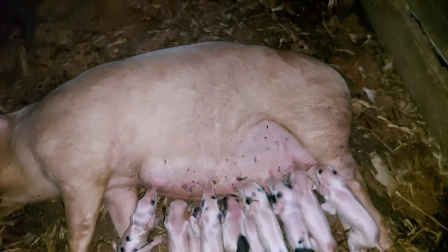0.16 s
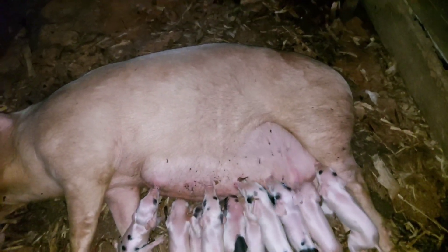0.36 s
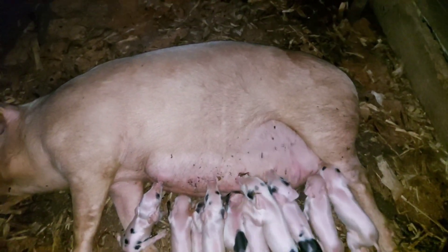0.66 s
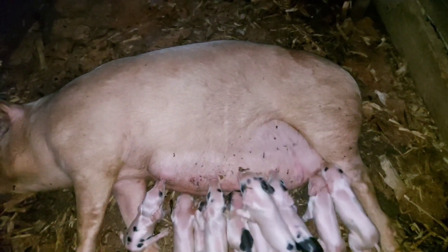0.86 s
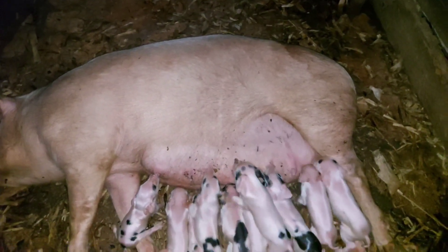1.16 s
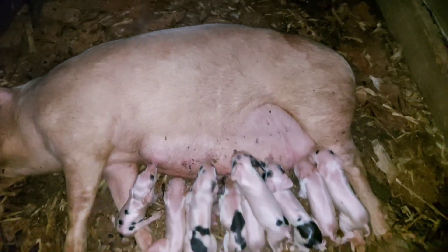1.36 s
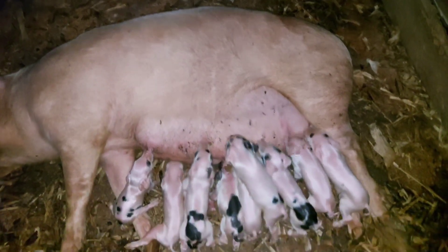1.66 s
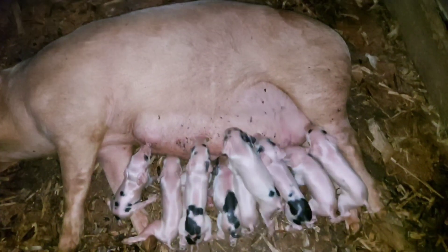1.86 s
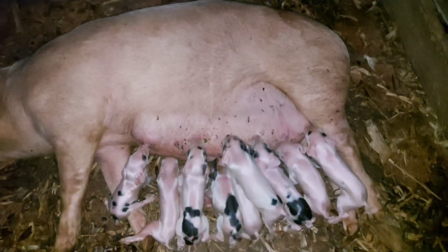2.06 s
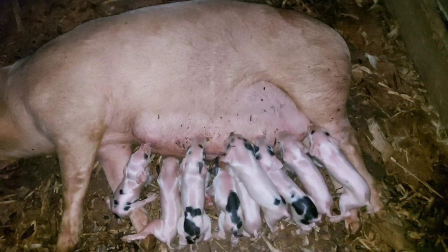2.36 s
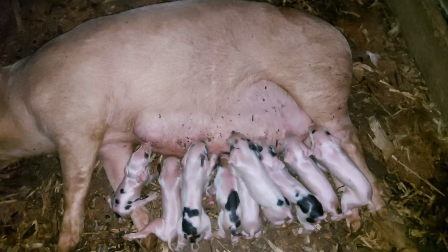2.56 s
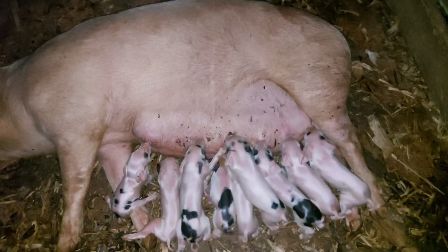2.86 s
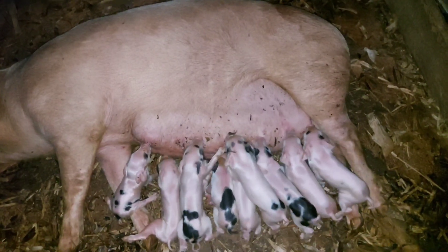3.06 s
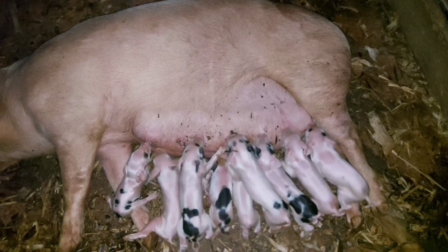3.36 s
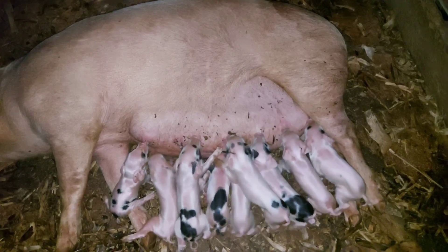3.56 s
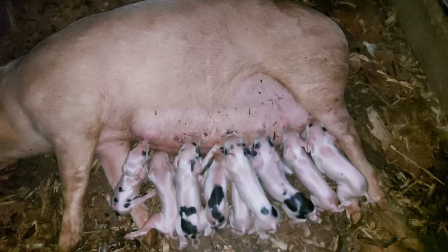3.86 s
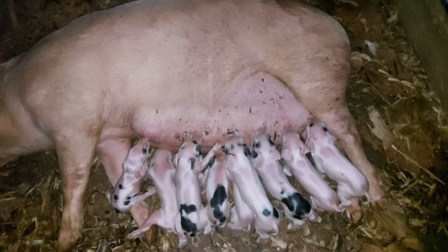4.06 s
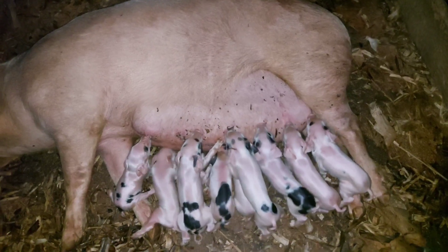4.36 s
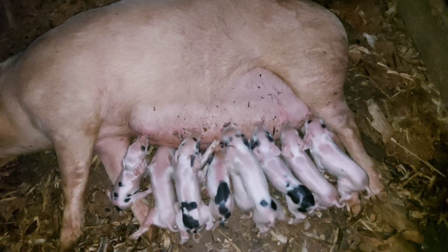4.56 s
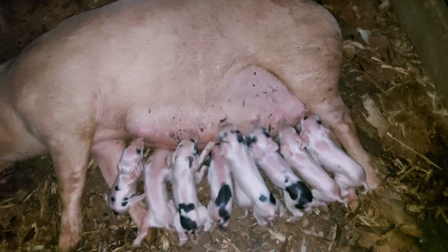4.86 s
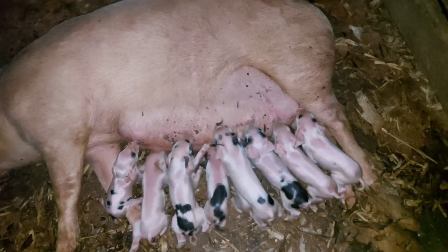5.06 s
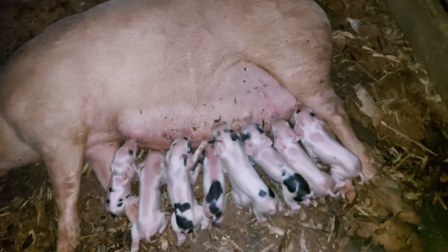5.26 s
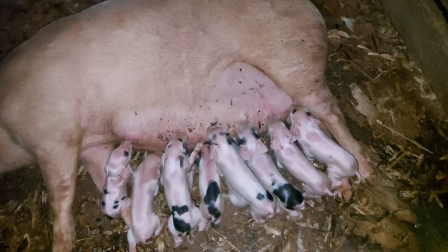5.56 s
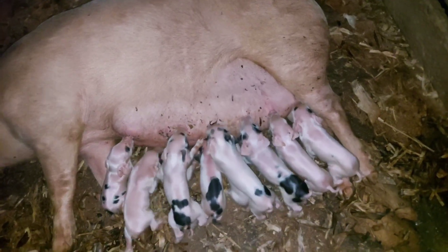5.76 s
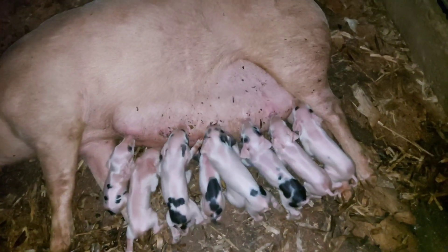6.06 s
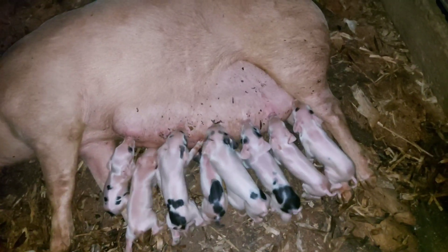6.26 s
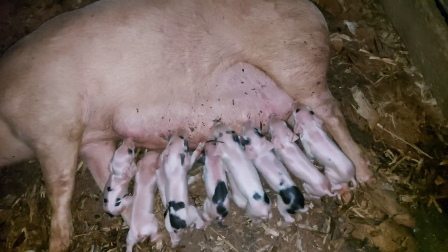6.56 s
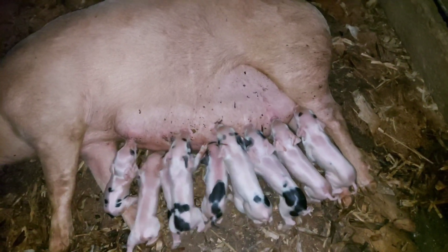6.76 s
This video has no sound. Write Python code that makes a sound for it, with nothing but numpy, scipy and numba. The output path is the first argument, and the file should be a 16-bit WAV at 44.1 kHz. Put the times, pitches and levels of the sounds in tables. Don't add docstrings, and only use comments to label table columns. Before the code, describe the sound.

Low throaty pig grunts in brief bursts, with wet suckling, thin nasal piglet whistles, straw crackles and a continuous high night-insect trill.

```python
import sys
import numpy as np
from scipy import signal
from scipy.fft import rfft, irfft
from scipy.io import wavfile
from scipy.ndimage import uniform_filter1d
from numba import njit

SR = 44100
rng = np.random.default_rng(int(sys.argv[2]) if len(sys.argv) > 2 else 0)


def volts_from_decibels(level):
    exponent = np.asarray(level, float) / 20
    return 10 ** exponent


def pcm_store(signal):
    levels = np.round(np.clip(np.atleast_2d(signal), -1, 1) * 32767)
    wavfile.write(sys.argv[1], SR, levels.astype(np.int16).T)


N = 304731
TIME = np.arange(N) / SR


def read(table):
    s, *columns = np.transpose(table)
    inside = 1. * ((TIME >= s[0]) & (TIME <= s[-1]))
    gate = uniform_filter1d(inside, size=441, mode="nearest")
    return gate, *(np.interp(TIME, s, c) for c in columns)


def unit(x):
    return x / np.sqrt(np.mean(x ** 2) + 1e-18)


def pan(db):
    return volts_from_decibels(np.array([[db], [-db]]) / 2)


def add(out, x, s):
    i = int(s * SR)
    out[:, i:i + x.shape[1]] += x[:, :N - i]


def colour(spectrum, side_db):
    hz, db = np.transpose(spectrum)
    bins_hz = np.arange(N // 2 + 1) * SR / N
    gain = volts_from_decibels(np.interp(np.log(bins_hz + 1), np.log(hz), db, left=-90, right=-90))
    mid, side = irfft(rfft(rng.standard_normal((2, N))) * gain, N)
    mid, side = unit(mid), volts_from_decibels(side_db) * unit(side)
    return np.array([mid + side, mid - side])


def walk(rate):
    hold = int(SR / rate)
    steps = np.repeat(rng.standard_normal(2500), hold)[:N]
    return unit(uniform_filter1d(uniform_filter1d(steps, hold), hold))


@njit
def svf(x, hz, width):
    y, band, low = np.empty(len(x)), 0., 0.
    for i in range(len(x)):
        g, k = np.tan(np.pi * hz[i] / SR), width / hz[i]
        v = (band + g * (x[i] - low)) / (1 + g * (g + k))
        band, low, y[i] = 2 * v - band, low + 2 * g * v, k * v
    return y


def ring(modes, chance, rise_s, scatter_db, spread):
    t = np.arange(SR // 3) / SR
    hz, db, t60 = np.transpose(modes)[:, :, None]
    decay = np.exp(-np.log(1000) * t / t60)
    rise = 1 - np.exp(-(t / rise_s) ** 2)
    size = volts_from_decibels(db + scatter_db * chance[0][:, None]) * decay * rise
    turn = 2 * np.pi * hz * (1 + 0.014 * chance[1][:, None]) * t + np.pi
    lead = spread * chance[2][:, None]
    left = np.sum(size * np.sin(turn + lead), axis=0)
    right = np.sum(size * np.sin(turn - lead), axis=0)
    out = np.array([left, right])
    return out / np.max(np.abs(out.mean(axis=0)))


# start in seconds, peak level in dB, chest level in dB, snout level in dB.
FLAPS = [(0.394, -35, -7, -22), (0.432, -16, -16, -21), (0.477, -9, -10, -15.5), (0.526, -15.5, -13.5, -20),
         (1.392, -34.5, 3, -36), (1.433, -27, -35, -64.5), (1.45, -22, -8, -36), (1.488, -9, -28, -29.5),
         (1.529, -9.5, -11, -25), (1.572, -15.5, -39, -35), (2.213, -31.5, -3, -23), (2.254, -19, -5, -15),
         (2.277, -10.5, -18.5, -15.5), (2.291, -6.5, -15, -30.5), (2.337, -8, -11.5, -38),
         (2.382, -20.5, -35, -33.5), (3.729, -37, -8, -15), (3.766, -16, -16.5, -21.5),
         (3.812, -7, -11.5, -15.5), (3.86, -11, -15, -16.5), (3.912, -15, -11, -23.5),
         (5.106, -28, -6, -35), (5.139, -12, -18, -11), (5.176, -9, -14, -22), (5.222, -9.5, -11.5, -23.5),
         (5.261, -12.5, -27, -31.5)]
# frequency in Hz, level in dB, 60 dB decay time in seconds.
CHEST = [(66.6, -12, 0.28), (94.9, -4, 0.17)]
# frequency in Hz, level in dB, 60 dB decay time in seconds.
THROAT = [(240, -7, 0.17), (335.3, 1, 0.22), (366.2, 1, 0.084), (423, 5, 0.056), (445.5, -2.5, 0.058),
          (506.4, -2, 0.089), (593, -3.5, .1), (630.7, -15, 0.27), (683, -18, 0.027), (780.6, -6, 0.096),
          (908, -13, 0.094), (1002, -10, 0.042), (1086, -20, 0.25)]
# frequency in Hz, bandwidth in Hz, level in dB.
SNOUT = [(1600, 360, -8.5), (2080, 240, 3.5), (2780, 430, 0), (3320, 160, 0.5), (3720, 130, -9),
         (4170, 160, -5.5)]


def sow():
    out = np.zeros((2, N))
    chance = rng.standard_normal((len(FLAPS), 3, 3, len(THROAT)))
    mid, side = rng.standard_normal((2, N))
    air = []
    for x in (mid + 1.1 * side, mid - 0.7 * side):
        bands = [volts_from_decibels(db) * svf(x, np.full(N, 1. * hz), 1. * width) for hz, width, db in SNOUT]
        air.append(unit(sum(bands)))
    soften = signal.butter(4, 5200, fs=SR, output="sos")
    air = signal.sosfilt(soften, np.array(air) * volts_from_decibels(3.8 * walk(250)))

    t = TIME[:SR // 8]
    burst = t / 0.0092 * np.exp(1 - t / 0.0071)
    breath = volts_from_decibels(-3) * np.clip(t / .004, 0, 1) * np.exp(-t / 0.045)
    puff = burst + breath
    for (s, db, chest_db, snout_db), (a, b, c) in zip(FLAPS, chance):
        throat = ring(THROAT, a, rise_s=.0012, scatter_db=1.5, spread=.2) * pan(2.4)
        chest = ring(CHEST, b[:, :len(CHEST)], rise_s=.009, scatter_db=1.5, spread=.04) * pan(.4)
        add(out, volts_from_decibels(db) * (throat + volts_from_decibels(chest_db + 0.5) * chest), s + .0011)
        echo = ring(THROAT, c, rise_s=.002, scatter_db=2.0, spread=.4)
        add(out, volts_from_decibels(db - 6.5) * echo, s + .0118)
        i = int(s * SR)
        add(out, volts_from_decibels(db + snout_db - 7.5) * puff * air[:, i:i + len(t)], s + .0005)
    out *= volts_from_decibels(1.6 * walk(130))
    out -= .7 * np.array([svf(x, np.full(N, 165.), 93.0) for x in out])
    return (out + volts_from_decibels(WALLS_DB) * walls(out)) * pan(1.0)


# start in seconds, glide in seconds, length in seconds,
# first pitch in Hz, last pitch in Hz, level in dB.
WHISTLES = [(1.165, 0.0233, 0.14, 1430, 2215, -51), (1.53, 0.042, .08, 1795, 2520, -42),
            (2.075, 0.13, 0.28, 1814, 2580, -46.5), (2.39, 0.026, 0.11, 1530, 2340, -49),
            (2.5, 0.042, 0.11, 1484, 2080, -42), (3.93, 0.024, 0.066, 1690, 1730, -47),
            (4.76, 0.03, 0.095, 2100, 2570, -50), (4.865, 0.065, 0.082, 1720, 1450, -51.5),
            (4.92, .025, 0.049, 1540, 2010, -40), (4.955, 0.063, 0.36, 1870, 2314, -46),
            (6.7, .02, 0.069, 1640, 1760, -45)]
# start in seconds, glide in seconds, length in seconds,
# first pitch in Hz, last pitch in Hz, level in dB.
SNIFFS = [(0, 0.066, 0.18, 720, 650, -48), (2.11, 0.06, 0.28, 1550, 2250, -46.5),
          (3.08, .1, 0.31, 750, 744, -61.5), (5.61, 0.031, 0.055, 900, 1130, -56.5),
          (5.72, .04, 0.027, 1082, 800, -56.5), (3.5, 0.056, 0.11, 1300, 1100, -61.5),
          (0, .02, 0.12, 2920, 2850, -45), (.02, .03, 0.069, 1400, 1520, -51),
          (.89, .03, 0.085, 1875, 2580, -54.5), (1.61, 0.16, 0.39, 1600, 2920, -44.5),
          (2.33, .05, 0.11, 1490, 1600, -44), (2.72, 0.18, 0.49, 2200, 2620, -53.5),
          (3.35, 0.18, 0.43, 2490, 2690, -55), (4.0, 0.18, 0.25, 2390, 2680, -57.5),
          (4.37, 0.17, 0.35, 1435, 2930, -44.5), (5.35, 0.13, 0.16, 2420, 2550, -56),
          (5.62, 0.062, 0.16, 2680, 2880, -47), (5.83, 0.042, .2, 2630, 2840, -57),
          (6.14, 0.037, 0.33, 2520, 2550, -55), (6.66, .1, 0.2, 2370, 2500, -58.5)]
# start in seconds, peak level in dB, pitch in Hz,
# 60 dB decay time in seconds, rise in seconds, left minus right in dB.
SMACKS = [(.021, -31, 657, 0.023, 0.00091, 2), (.113, -48, 305, 0.033, 0.0022, -5),
          (.757, -41.5, 300, 0.1, 0.0016, 5), (.76, -39.5, 590, 0.072, .004, 5),
          (1.81, -42, 295, 0.15, 0.0051, -2), (1.88, -31, 281, 0.087, 0.013, 1.5),
          (1.88, -50, 538, 0.11, 0.013, 7), (2.94, -49.5, 900, 0.037, .002, 13),
          (3.15, -36.5, 1994, 0.027, .002, 8), (3.555, -47.5, 820, 0.048, 0.0022, 10),
          (4.676, -57, 786, 0.036, .002, 8), (5.015, -22, 1990, 0.021, 0.00075, 6),
          (5.62, -38, 2107, 0.076, 0.0016, 4), (6.56, -48, 240, 0.099, .004, 7),
          (6.703, -56, 616, 0.036, 0.0016, 3)]
# time in seconds, level in dB.
SUCKLING = [
    [(0.0, -51), (0.32, -53.5), (0.42, -59.5)],
    [(0.62, -54), (0.69, -61.5), (1.46, -59.5)],
    [(1.62, -46), (2.124, -62.5), (2.2, -56)],
    [(2.45, -47), (2.572, -58), (3.3, -54.5), (3.75, -66.5)],
    [(3.95, -54), (4.202, -62), (4.98, -48), (5.1, -56)],
    [(5.3, -50.5), (5.496, -51.5), (5.922, -57.5), (6.68, -60), (6.91, -53.5)],
]
# frequency in Hz, density in dB per Hz.
SUCKLING_COLOUR = [(1100, -24), (1400, -12), (2000, -4), (2600, 1.5), (3000, -3), (3200, -9)]


def piglets():
    whistles = nose(WHISTLES, width_hz=70., rasp=.3)
    out = (whistles + nose(SNIFFS, width_hz=190.0, rasp=0.46)) * volts_from_decibels(2.0 * walk(45))
    out = signal.sosfilt(signal.cheby2(8, 40, 3250, fs=SR, output="sos"), out)
    chance = rng.standard_normal((len(SMACKS), 3, 2))
    for (s, db, hz, t60, rise_s, pan_db), c in zip(SMACKS, chance):
        modes = [(hz, 0, t60), (1.17 * hz, -9, 1.3 * t60)]
        add(out, volts_from_decibels(db) * pan(pan_db) * ring(modes, c, rise_s, scatter_db=3.5, spread=0.1), s)
    hiss = colour(SUCKLING_COLOUR, side_db=0.0)
    hiss = hiss * volts_from_decibels(read(np.concatenate(SUCKLING))[1] - 2.0 + 3.2 * walk(17))
    return out + volts_from_decibels(WALLS_DB + 8) * walls(out) + hiss


def nose(rows, width_hz, rasp):
    out = np.zeros((2, N))
    for s, glide_s, length_s, from_hz, to_hz, db in rows:
        t = TIME[:int(length_s * SR)]
        hz = from_hz + (to_hz - from_hz) * np.clip(t / glide_s, 0, 1) ** 0.67
        mid, side = rng.standard_normal((2, SR))[:, :len(t)]
        air = []
        for x in (mid + 0.52 * side, mid - .6 * side):
            note = unit(svf(svf(x, hz, width_hz), hz, 2 * width_hz))
            under = unit(svf(svf(x, 0.86 * hz, 450.0), 0.86 * hz, 440.0))
            air.append(note + rasp * under)
        shape = np.clip(t / 0.0048, 0, 1) * np.clip((length_s - t) / (0.41 * length_s), 0, 1)
        add(out, volts_from_decibels(db) * shape * np.array(air), s)
    return out


# start in seconds, peak level in dB, dull crack in dB, top hiss in dB,
# 60 dB decay time in seconds.
SNAPS = [(0.1955, -27, -5, -14, 0.08), (0.251, -23, -2, -13, 0.054), (0.2808, -35, 5.5, -18, 0.057),
         (0.5322, -28.5, 0.5, -9, 0.059), (0.745, -38.5, -2, -11, 0.12), (0.8987, -34.5, 0.5, -14, 0.08),
         (1.1368, -29, 0.5, -12, 0.08), (1.2268, -31, -3, -7, 0.2), (1.3882, -46, -11, 4, 0.11),
         (1.541, -31, 3, 2, 0.069), (1.6781, -39, -8, -1, 0.08), (1.7389, -32, -7, -4, 0.056),
         (2.1779, -53, 2, -17, 0.078), (2.2802, -23, -9, -10, 0.08), (2.6549, -26, -9, -3, 0.06),
         (2.946, -31.5, -15, -1, 0.13), (3.0654, -54, -10, -7, 0.08), (3.21, -34, -2, 0, 0.08),
         (3.3005, -27, -2.5, -6, 0.05), (3.506, -46, 0, -19, 0.065), (3.678, -42, -3, -11, 0.072),
         (3.7312, -47, 12, -13, 0.08), (3.7978, -29.5, 3, -15, 0.046), (3.8511, -35, -1, -12, 0.24),
         (4.1844, -33.5, -10, -14, 0.09), (4.433, -34, -1, -1, 0.08), (4.5456, -39, 3, -10, 0.15),
         (4.8898, -37, 1, -8, 0.08), (5.346, -23.5, -6, -5, 0.066), (5.5687, -33.5, -2, -7, 0.08),
         (5.6331, -32.5, -5, -1, 0.088), (5.694, -18.5, -6, 4, 0.11), (5.953, -39, 5, -2, 0.11),
         (6.0197, -37, 3, -11, 0.07), (6.0871, -32, -1, -13, 0.074), (6.2522, -41, 4, -19, 0.14),
         (6.311, -17.5, -4, -21, 0.052)]
# time in seconds, level in dB.
RUSTLE = [(0.0, -57.5), (0.35, -51), (0.92, -59.5), (1.13, -58), (1.29, -59), (1.79, -53), (2.04, -58),
          (2.67, -53.5), (2.79, -56.5), (2.94, -56.5), (3.58, -59), (3.89, -53), (4.14, -59), (4.83, -57),
          (5.14, -54.5), (5.56, -58.5), (6.16, -57), (6.39, -56), (6.91, -59)]
# frequency in Hz, density in dB per Hz.
STRAW = [(7000, -26), (7600, 6), (8600, 1), (9900, -5), (11000, 0.5), (11500, -29)]
# frequency in Hz, density in dB per Hz.
STRAW_TOP = [(10500, -41), (11000, -6), (12400, -4.5), (14500, -7.5), (15600, -11), (16300, -39)]


def straw():
    bright, top = colour(STRAW, side_db=1.0), colour(STRAW_TOP, side_db=-0.5)
    dull_spectrum = [(1800, -37.5), (3600, -13.5), (4300, -15), (6500, -2), (7600, -12.5)]  # Hz, dB per Hz
    dull = colour(dull_spectrum, side_db=-4.0)
    stir_db = 2.2 * walk(11)
    bed_gain = volts_from_decibels(read(RUSTLE)[1] - 1.5 + stir_db)
    out = bed_gain * (bright * volts_from_decibels(0.79 * walk(18)) + volts_from_decibels(0.1 + 0.85 * walk(14)) * top)
    crackle = volts_from_decibels(3.2 * walk(300))
    t = TIME[:SR // 4]
    rise = np.clip(t / 0.0032, 0, 1)
    for s, db, dull_db, top_db, t60 in SNAPS:
        fall = np.exp(-np.log(1000) * t / t60) + volts_from_decibels(-11) * np.exp(-np.log(1000) * t / (2.5 * t60))
        now = slice(int(s * SR), int(s * SR) + len(t))
        crack = bright[:, now] + volts_from_decibels(dull_db + 5.5) * dull[:, now] + volts_from_decibels(top_db + 4) * top[:, now]
        add(out, volts_from_decibels(db - 16) * rise * fall * crackle[now] * crack, s - .002)
    return out * pan(-4.5)


# time in seconds, click rate in Hz, level in dB.
BUZZES = [
    [(0, 169.2, -34), (.27, 167.8, -39), (.33, 173, -53)],
    [(.25, 167, -50), (.35, 163.8, -45), (.9, 164.6, -48.5), (1.1, 165, -46)],
    [(1.0, 179.4, -48), (1.2, 175.8, -41), (1.6, 173.4, -40), (2.0, 171.7, -44.5), (2.4, 172.8, -39.5),
     (3.1, 171, -43.5), (4.1, 171.6, -43), (4.2, 171.4, -57)],
    [(1.9, 174, -74), (2.3, 171, -48.5), (4.1, 170.1, -47.5), (4.2, 170, -65)],
    [(4.1, 157.4, -46.5), (4.25, 158, -49), (4.75, 157.9, -46), (4.9, 157, -59)],
    [(4.75, 184, -50), (4.9, 181.5, -43.5), (5.3, 178.7, -39.5), (5.6, 176.6, -41), (6.1, 174.2, -40.5),
     (6.22, 172.9, -49)],
    [(6.2, 167.6, -60), (6.4, 168.5, -50.5), (6.91, 166.4, -51.5)],
]
# frequency in Hz, bandwidth in Hz, level in dB.
WING = [(4785, 530, -9), (5520, 870, -4), (6340, 570, -8.5), (6970, 540, -11.5)]
# time in seconds, level in dB.
CHORUS = [(0.0, -43), (0.11, -43), (0.29, -41.5), (0.83, -46), (1.38, -41), (3.92, -44), (4.18, -46),
          (4.77, -45), (5.12, -41), (5.93, -43.5), (6.25, -45.5), (6.91, -45.5)]
# frequency in Hz, density in dB per Hz.
CHORUS_COLOUR = [(3200, -18), (3700, -13.5), (4200, -4), (4730, 1), (5110, -6.5), (5480, 3.5), (6300, -4),
                 (7170, -7.5), (7640, -19), (9000, -49)]


def insects():
    chorus = colour(CHORUS_COLOUR, side_db=-0.5)
    out = chorus * volts_from_decibels(read(CHORUS)[1] - 2.5 + 2.4 * walk(7.6)) * pan(-3.5)
    orders = np.arange(22, 48)[:, None]
    for table in BUZZES:
        gate, hz, db = read(table)
        on = gate > 0
        turn = 2 * np.pi * np.cumsum(hz[on] * (1 + 0.00043 * walk(15)[on])) / SR
        lines_hz = orders * hz[on].mean()
        wing = sum(volts_from_decibels(d) / np.hypot(1, 2 * (lines_hz - f) / w) ** 2 for f, w, d in WING)
        for channel in range(2):
            shift = rng.standard_normal((len(orders), 1))
            knots = rng.standard_normal((len(orders), 32))
            scatter = np.array([np.interp(TIME[on] / .17, np.arange(32), k) for k in knots])
            lines = wing * volts_from_decibels(4.4 * scatter) * np.sin(orders * turn + 2.48 * shift)
            comb = unit(np.sum(lines, axis=0))
            level = (gate * volts_from_decibels(db + 0.6 * walk(6)))[on]
            out[channel, on] += level * comb * pan(-6.0)[channel]
    return out


# time in seconds, rumble level in dB, murmur level in dB.
PEN = [
    [(0.0, -63, -57), (0.016, -50, -48.5), (0.38, -59, -56)],
    [(0.62, -61, -53), (0.922, -63, -55.5), (1.042, -60, -60), (1.32, -62, -58), (1.38, -54, -63)],
    [(1.68, -73, -56), (1.882, -54, -52), (2.04, -48, -66), (2.2, -50, -58.5)],
    [(2.48, -54, -48), (2.886, -59, -62), (3.176, -56, -54.5), (3.298, -71, -57), (3.352, -51.5, -60),
     (3.702, -59, -58.5), (3.72, -53, -60)],
    [(4.0, -51, -51.5), (4.238, -60.5, -57.5), (4.506, -46, -60.5), (4.856, -56.5, -62.5),
     (5.044, -52, -57.5), (5.09, -41, -58)],
    [(5.36, -43, -50.5), (5.466, -55.5, -57.5), (6.534, -59, -62), (6.572, -54, -55), (6.65, -52, -65.5),
     (6.714, -57, -53), (6.776, -54, -63.5), (6.91, -70, -62)],
]
# frequency in Hz, density in dB per Hz.
RUMBLE = [(13, -74), (22, -29), (41, -15), (59, 2), (105, -2), (118, -3), (140, -26.5), (190, -15),
          (250, -63), (420, -120)]
# frequency in Hz, density in dB per Hz.
MURMUR = [(76, -52), (130, 0), (173, -8.5), (248, -7.5), (295, 1.5), (381, -9), (444, -10), (550, -8),
          (591, -14), (642, -13.5), (787, -10.5), (937, -20.5), (1500, -18.5), (1950, -49), (3300, -120)]
# time in seconds, pitch in Hz, level in dB.
FAR_CALL = [(0.15, 683, -55), (0.358, 637.5, -59), (0.488, 600.0, -42), (0.594, 647, -48),
            (1.0, 614, -69.5)]


def pen():
    _, rumble_db, murmur_db = read(np.concatenate(PEN))
    rumble = colour(RUMBLE, side_db=-13.5) * volts_from_decibels(rumble_db)
    murmur = colour(MURMUR, side_db=-5.5) * volts_from_decibels(murmur_db + 1.57 * walk(17)) * pan(3.8)
    gate, hz, db = read(FAR_CALL)
    tone = np.sqrt(2) * np.sin(2 * np.pi * np.cumsum(hz) / SR)
    call = gate * volts_from_decibels(db + 1.2 * walk(28.4)) * tone * pan(5.2)
    return rumble + murmur + call


WALLS_T60_S, WALLS_DB = 0.24, -7.5


def walls(x):
    t = TIME[:SR // 2]
    decay = np.exp(-np.log(1000) * t / WALLS_T60_S)
    build_up = np.clip(t / 0.004, 0, 1) ** 2
    mid, side = rng.standard_normal((2, len(t))) * decay * build_up
    side = signal.sosfilt(signal.butter(2, 450, "high", fs=SR, output="sos"), side)
    tail = np.array([mid + side, mid - side]) / np.sqrt(2 * np.sum(mid ** 2))
    return signal.fftconvolve(x.mean(axis=0, keepdims=True), tail, axes=1)[:, :N]


def scene():
    return sow() + piglets() + straw() + insects() + pen()


def roll_off(x):
    return signal.sosfilt(signal.butter(12, 15830, fs=SR, output="sos"), x)


def record(dry):
    mix = signal.sosfilt(signal.butter(3, 42, "high", fs=SR, output="sos"), dry)
    return roll_off(mix)


dry = scene()
out = record(dry)
pcm_store(out)
```